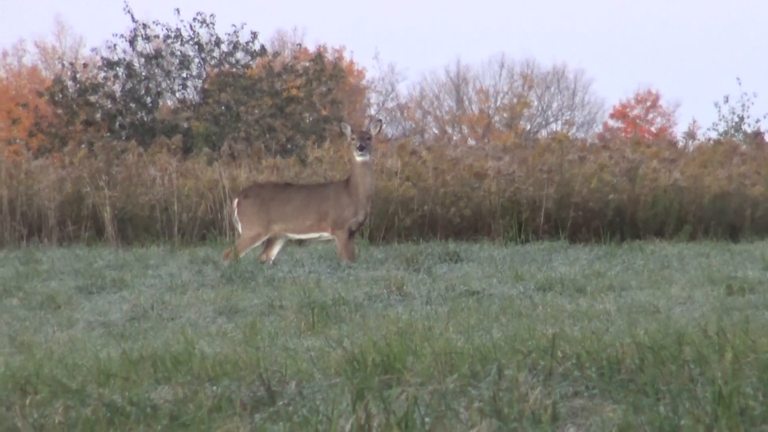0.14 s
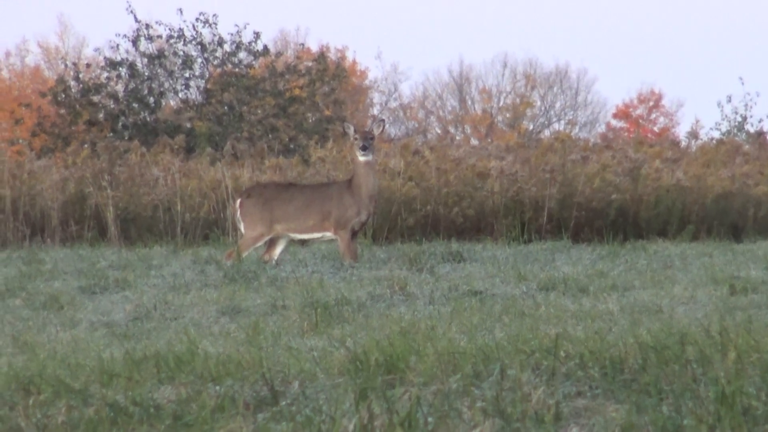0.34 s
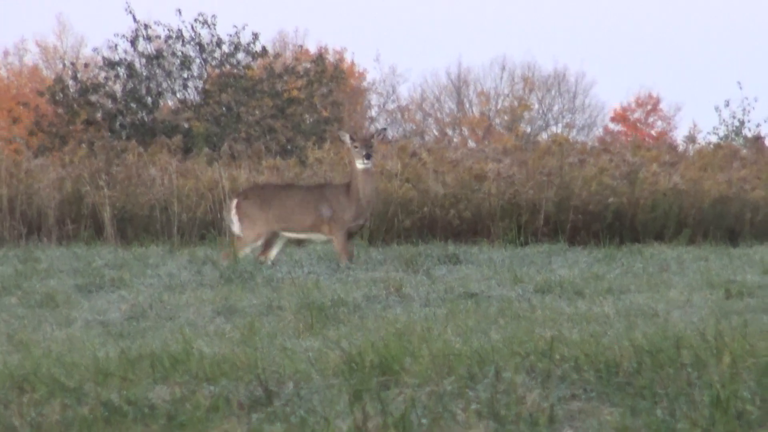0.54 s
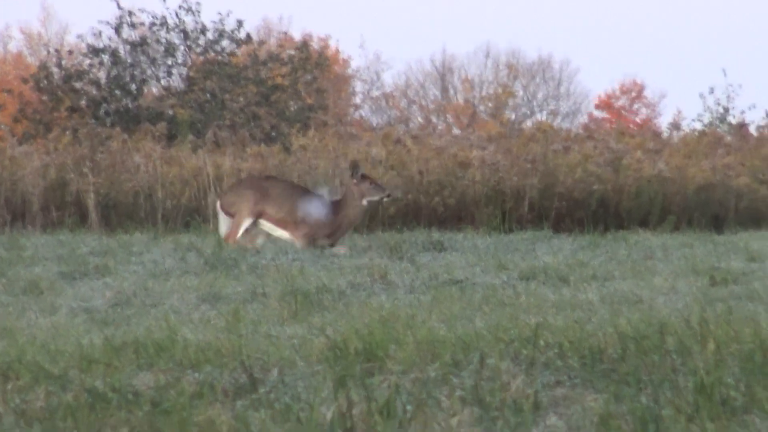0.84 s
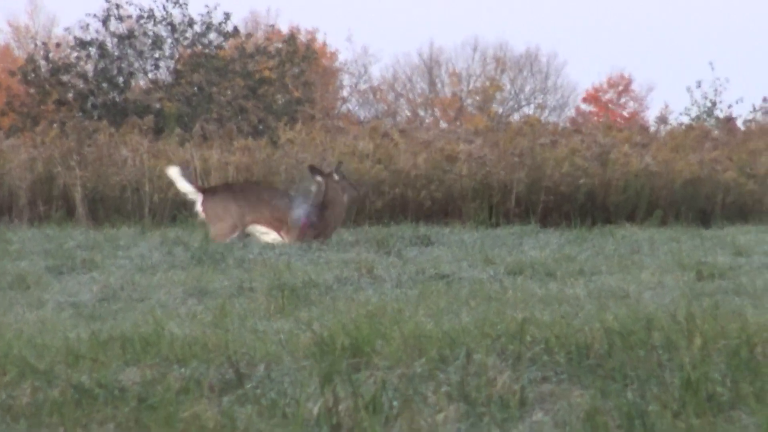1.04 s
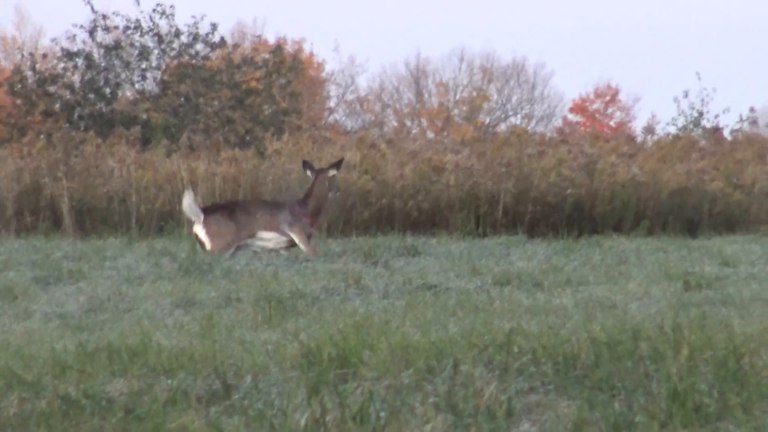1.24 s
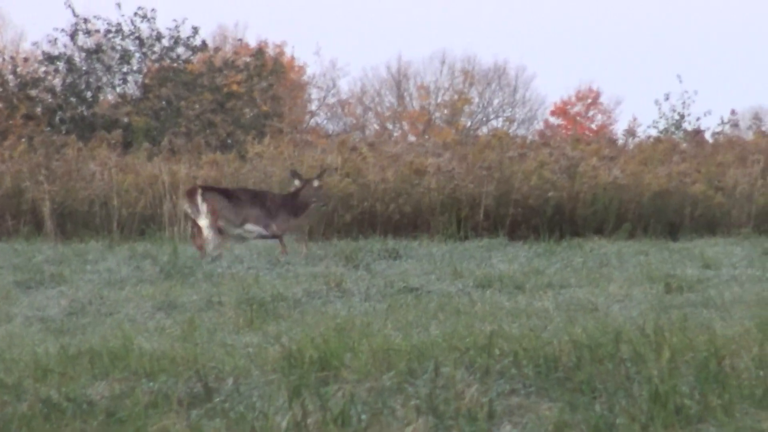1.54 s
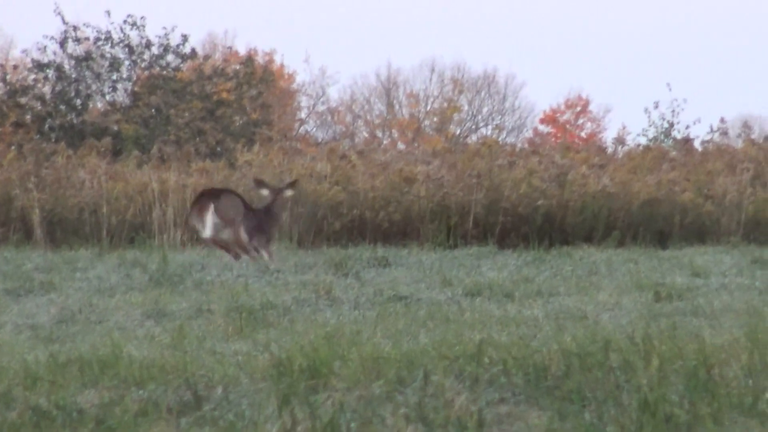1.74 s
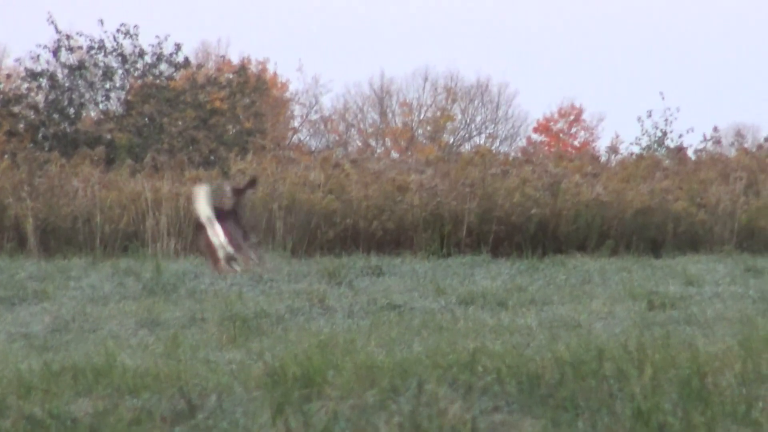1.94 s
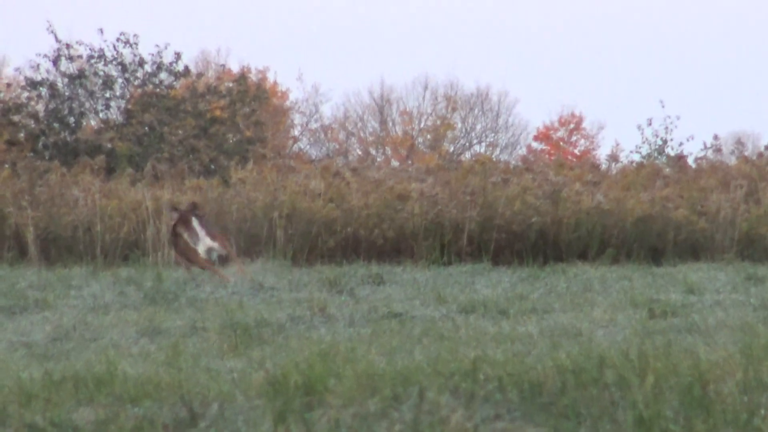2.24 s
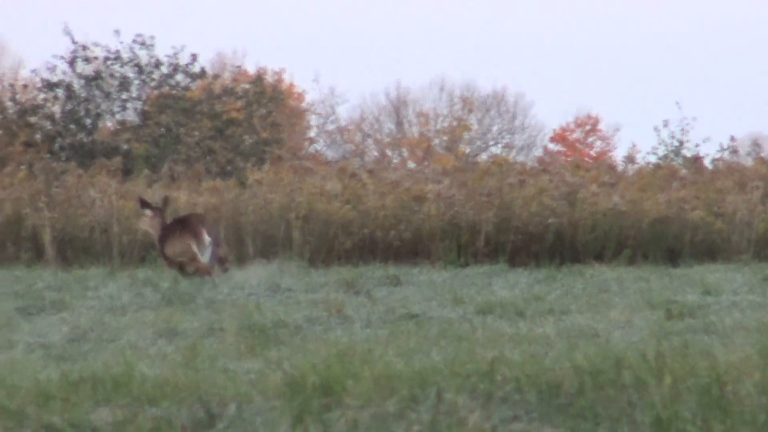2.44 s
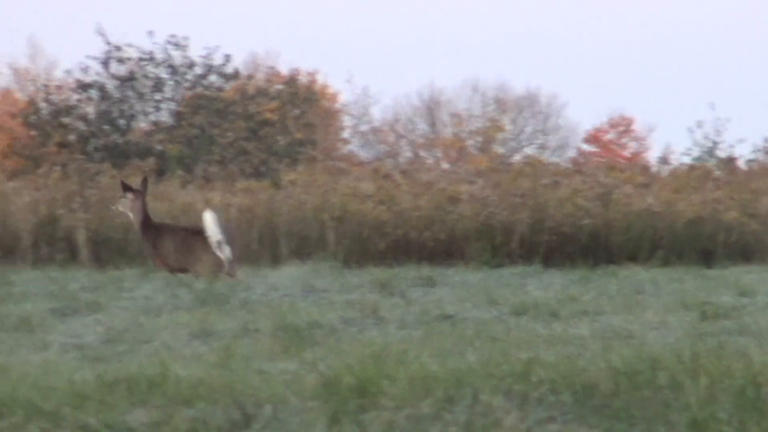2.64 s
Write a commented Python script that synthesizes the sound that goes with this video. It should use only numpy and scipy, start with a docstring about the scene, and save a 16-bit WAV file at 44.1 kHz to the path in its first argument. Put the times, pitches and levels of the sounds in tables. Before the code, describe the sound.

A rifle fires once close to the microphone in a quiet open meadow, overloading it slightly; scattered reflections follow, a distant bullet slap and thud, then a long rumbling echo from the tree line.

```python
"""At the edge of a meadow, one rifle shot close by. Noise bursts make the report, and it overloads the
microphone. Random small reflections scatter back from grass and weeds, duller the later they arrive.
The bullet's slap and thud, short swelling tones, return from far off, and about a second after the shot
the tree line answers with a long roll of reflections, pressure pulses and a low boom."""
import sys
import numpy as np
from scipy import signal
from scipy.fft import rfft, irfft, next_fast_len
from scipy.io import wavfile
from scipy.ndimage import uniform_filter1d

SR = 44100
rng = np.random.default_rng(int(sys.argv[2]) if len(sys.argv) > 2 else 0)


def generate_wav(signal):
    """Clip the signal to [-1, 1] and save it as 16-bit WAV at the path in sys.argv[1]."""
    frames = np.transpose(np.atleast_2d(signal))
    scaled = np.clip(frames, -1, 1) * 32767
    pcm = np.round(scaled).astype(np.int16)
    wavfile.write(sys.argv[1], SR, pcm)


N = 123479
T = np.arange(N) / SR  # seconds
SIZE = next_fast_len(N // 2 + SR // 8, True) * 2  # FFT length, with room for filter tails
HZ = np.maximum(np.arange(SIZE // 2 + 1) * SR / SIZE, 1)

# Parts of the report. Each row: delay after the crack in seconds, level in dB, hold in seconds,
# fall in dB per second, centre in Hz, width (standard deviation) in octaves.
REPORT_BURSTS = [(0, -22, 0.0042, 908.5, 2000, 1.8), (.0042, -14.5, 0.0071, 482.5, 3880, .9),
                 (.009, -21.5, 0.025, 401.5, 1080, 1.4), (0.018, -20, 0.0054, 1000.5, 420, 1.2)]
# Sharp returns from single bushes, trees and wood edges. Each row: arrival in seconds, pulse peak in dB,
# scatter level in dB before filtering and distance loss, scatter decay length in seconds.
SHARP_RETURNS = [(0.29, -25, -3.5, .01), (0.325, -26, -5, 0.0085), (0.724, -12, -6, 0.016),
                 (0.844, -27, -7.5, 0.013), (.926, -27, -9, 0.0068), (1.122, -38, 2, 0.009),
                 (1.164, -22, 0.5, 0.0068), (1.174, -22, 0.5, 0.004), (1.226, -16, 0, 0.0091),
                 (1.254, -25, -7, 0.03), (1.286, -13, -1.5, .018), (1.342, -18, -15.5, 0.01),
                 (1.436, -18, -4, 0.045), (1.564, -16.5, -1, 0.027), (1.729, -21, -4.5, 0.023),
                 (2.143, -25, -11.5, 0.014), (2.194, -16.5, -4.5, .03), (2.361, -21.5, -3, 0.02),
                 (2.469, -21, 2, .008), (2.565, -31.5, -7, 0.017), (2.749, -43, -23, 0.016)]
# Strength of the scatter before filtering and distance loss. Each row: time in seconds, level in dB.
FIELD_LEVEL = [(.24, -12.5), (.29, -2.5), (.37, 0.5), (.48, 1), (.62, 2), (.73, -1.5), (.82, -2.5),
               (.95, -2.5), (1.135, -2), (1.22, -2), (1.8, -8)]
WOODS_LEVEL = [(1.0, -51), (1.11, -15), (1.148, -18), (1.17, -6.5), (1.2, -5.5), (1.3, -3), (1.39, -2),
               (1.5, -1.5), (1.63, -1.5), (1.8, -0.5), (1.95, -0.5), (2.1, -1.5), (2.3, -1.5), (2.5, -1),
               (2.66, -4.5), (2.8, -2.5)]
# Level of the deep rumble and of the tree line's low boom. Each row: time in seconds, level in dB.
RUMBLE_LEVEL = [(.24, -43), (.27, -36.5), (.35, -31.5), (.44, -45), (.5, -35), (.59, -32.5), (.63, -39),
                (.69, -29.5), (.77, -32.5), (.88, -36), (1.12, -41), (1.18, -32.5), (1.26, -40.5),
                (1.45, -37), (1.7, -41), (1.95, -46), (2.25, -47.5), (2.8, -53)]
BOOM_LEVEL = [(1.08, -71), (1.17, -30.5), (1.225, -25), (1.29, -27), (1.38, -34), (1.45, -30.5), (1.6, -29),
              (1.72, -29.5), (1.85, -36.5), (2.2, -46), (2.8, -59.5)]
# Side from which the sound returns. Each row: time in seconds, left minus right in dB.
BEARING = [(.24, 3.5), (.35, 4), (.45, 3), (.62, 0), (.8, 1.5), (1.12, 0.3), (1.4, 3.5), (1.65, 3),
           (2.1, 2), (2.8, 0)]
# Tone colours for unit white noise. Each row: frequency in Hz, level in dB per half octave.
FIELD_SPECTRUM = [(60, -57.5), (115, -38), (170, -36.5), (310, -31.5), (450, -33.5), (600, -32),
                  (950, -31.5), (1800, -29), (2600, -28), (3600, -29), (5000, -33), (7000, -33.5),
                  (8200, -39.5), (9000, -49.5)]
WOODS_SPECTRUM = [(90, -48.5), (160, -56), (215, -42.5), (290, -31.5), (430, -26), (620, -23.5), (880, -23),
                  (1300, -23.5), (1800, -24), (2500, -22), (3600, -22.5), (5000, -23.5), (6500, -29),
                  (8500, -62)]
BOOM_SPECTRUM = [(100, -43), (160, -19.5), (215, -5), (285, 10.5), (340, 10.5), (420, -8), (700, -51)]
RUMBLE_SPECTRUM = [(18, -47), (35, -6), (55, 4), (80, 11.5), (105, 8), (150, -34.5), (300, -86)]
STILL_AIR_SPECTRUM = [(20, -80), (45, -71), (110, -70), (165, -78), (320, -67), (620, -77), (950, -85),
                      (2500, -87), (5000, -87), (7000, -85), (8000, -87), (9000, -96)]
# The bullet strikes. Each row: start in seconds, pitch in Hz, envelope peak in dB, rise time in seconds.
BULLET_STRIKES = [(.7915, 650, -13, 0.0015), (.802, 85, -18.5, 0.0097), (.792, 2500, -34, .0005)]

BLAST_S, CRACK_S = .22, .2345  # scatter and rumble begin and flight time counts from here; report begins
FIELD_AIR_DB_PER_S, WOODS_AIR_DB_PER_S = 7.5, 9  # treble loss at 1 kHz, greater among trees
AIR_POWER = .86  # how that loss grows with frequency
GROUND_HZ, GROUND_OCTAVES, GROUND_DB_PER_S = 167, .58, 20  # soft ground cancels a band, more with distance
FIELD_RETURNS_PER_S, WOODS_RETURNS_PER_S = 9000, 4000  # density of the scatter
FIELD_SIDE_DB, WOODS_SIDE_DB, REPORT_SIDE_DB = -16.5, -22, -13  # gain of the stereo difference
PULSE_HZ = 400  # centre of a returning pressure pulse
OVERLOAD = .38  # amplitude ceiling of the input
CUTOFF_HZ = 8900


def amp(db):
    """Decibels to gain."""
    return 10 ** (np.asarray(db) / 20)


def curve(rows):
    """A control joined by straight lines in time."""
    return np.interp(T, *np.transpose(rows))


def colour(x, spectrum):
    """Causal minimum-phase filter that gives unit white noise the listed half-octave levels."""
    hz, db = np.transpose(spectrum)
    width = np.maximum(HZ, hz[0]) * np.log(2) / 2
    level = amp(np.interp(np.log(HZ), np.log(hz), db))
    gain = level * np.sqrt(SR / 2 / width)
    # folding the cepstrum forward in time keeps the filter from ringing ahead of a sound
    cepstrum = irfft(np.log(gain))
    cepstrum[1:SIZE // 2] *= 2
    cepstrum[SIZE // 2 + 1:] = 0
    response = np.exp(rfft(cepstrum))
    return irfft(rfft(x, SIZE) * response)[..., :N]


def stereo(mid, side, side_db):
    """Left and right from a common and a differing part."""
    return mid + amp(side_db) * side * np.array([[1], [-1]])


def steady(x):
    """Even out slow chance swells to an rms near 1."""
    power = uniform_filter1d(np.mean(x ** 2, axis=0), size=3000)
    return x / np.sqrt(power + 1e-12)


def returns(per_s, spread_db):
    """Many small reflections at random times, of either sign and uneven size; rms 1."""
    hits = rng.random(N) < per_s / SR
    signs = rng.choice([-1, 1], N)
    sizes = amp(spread_db * np.clip(rng.standard_normal(N), -2, 2))
    x = hits * signs * sizes
    return x / x.std()


def travel(x, air_db_per_s, ground_db_per_s):
    """Later sound has come farther: the air takes the treble, the ground a low band."""
    centres = np.geomspace(60, 10000, 20)
    flight = np.maximum(T - BLAST_S, 0)
    spectrum = rfft(x, SIZE)
    out = 0
    for hz, share in zip(centres, np.eye(len(centres))):
        # overlapping triangular bands that add up to the whole
        band = irfft(spectrum * np.interp(HZ, centres, share))[..., :N]
        air = air_db_per_s * (hz / 1000) ** AIR_POWER
        ground = ground_db_per_s * np.exp(-.5 * (np.log2(hz / GROUND_HZ) / GROUND_OCTAVES) ** 2)
        out = out + band * amp(-flight * (air + ground))
    return out


def still_air():
    """The quiet meadow: steady coloured noise, slightly wide."""
    return stereo(*colour(rng.standard_normal((2, N)), STILL_AIR_SPECTRUM), side_db=-12)


def field():
    """Dense scatter from grass and weeds, losing treble and a low band with flight time."""
    reflections = returns(FIELD_RETURNS_PER_S, spread_db=2.5)
    scatter = stereo(reflections, rng.standard_normal(N), FIELD_SIDE_DB)
    scatter = scatter * amp(curve(FIELD_LEVEL)) * (T >= BLAST_S)
    return travel(colour(scatter, FIELD_SPECTRUM), FIELD_AIR_DB_PER_S, GROUND_DB_PER_S)


def rumble():
    """The deepest part of the blast rolls along the ground: evened-out low noise on a level curve."""
    roll = colour(stereo(*rng.standard_normal((2, N)), side_db=-19), RUMBLE_SPECTRUM)
    fade_in = np.clip((T - BLAST_S) / .004, 0, 1)
    return steady(roll) * amp(curve(RUMBLE_LEVEL)) * fade_in


def report():
    """Crack, bright blast and a low push: noise bursts that start at once, hold and fall."""
    out = 0
    for delay, db, hold, fall, hz, octaves in REPORT_BURSTS:
        age = T - CRACK_S - delay
        shape = np.exp(-.5 * (np.log2(HZ / hz) / octaves) ** 2) / np.sqrt(HZ)
        noise = irfft(rfft(rng.standard_normal((2, N)), SIZE) * shape)[:, :N]
        envelope = (age >= 0) * amp(db - fall * np.maximum(age - hold, 0))
        out = out + stereo(*noise / noise.std(), REPORT_SIDE_DB) * envelope
    return out


def woods():
    """A roll of reflections from the trees, with rounded pressure pulses that each trail their own scatter."""
    power = amp(curve(WOODS_LEVEL)) ** 2 * (T > WOODS_LEVEL[0][0])
    pulses = 0
    for s, pulse_db, scatter_db, length in SHARP_RETURNS:
        spread = (np.pi * PULSE_HZ * (T - s)) ** 2
        # a deep trough between two low humps
        pulses = pulses + amp(pulse_db) * (2 * spread - 1) * np.exp(-spread)
        power = power + (T >= s) * amp(scatter_db) ** 2 * np.exp(-np.abs(T - s) / length)
    reflections = returns(WOODS_RETURNS_PER_S, spread_db=2)
    scatter = stereo(reflections, rng.standard_normal(N), WOODS_SIDE_DB)
    roll = colour(scatter * np.sqrt(power), WOODS_SPECTRUM)
    return pulses + travel(roll, WOODS_AIR_DB_PER_S, ground_db_per_s=0)


def impact():
    """The bullet's distant slap and thud, each a sine under a quick swell and decay."""
    out = 0
    for s, hz, db, rise in BULLET_STRIKES:
        age = np.maximum(T - s, 0)
        swell = (age / rise) ** 2 * np.exp(2 * (1 - age / rise))
        out = out + amp(db) * swell * np.sin(2 * np.pi * hz * age)
    return out


def boom():
    """The low-mid body of the tree line's echo, strongest from the nearest wall of trees."""
    reflections = returns(WOODS_RETURNS_PER_S, spread_db=5.5)
    roll = colour(stereo(reflections, rng.standard_normal(N), WOODS_SIDE_DB), BOOM_SPECTRUM)
    return steady(roll) * amp(curve(BOOM_LEVEL)) * (T > BOOM_LEVEL[0][0])


def scene():
    """Shot and echoes, swinging a little to the left, with the centred bullet strikes over a quiet meadow."""
    swing = amp(curve(BEARING) * np.array([[.5], [-.5]]))
    shot = (field() + rumble() + report() + woods() + boom()) * swing
    return still_air() + shot + impact()


def record(dry):
    """The blast overloads the input, which rounds off its peaks; then the top is cut steeply."""
    clipped = dry / (1 + (dry / OVERLOAD) ** 4) ** .25
    top_cut = signal.ellip(10, .2, 80, CUTOFF_HZ, fs=SR, output="sos")
    return signal.sosfilt(top_cut, clipped)


dry = scene()
out = record(dry)
generate_wav(out)
```